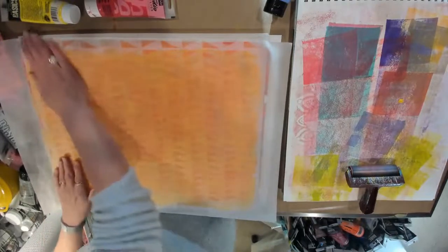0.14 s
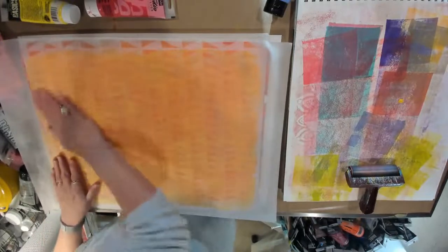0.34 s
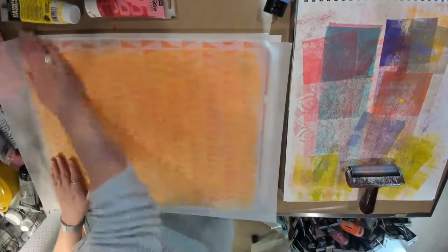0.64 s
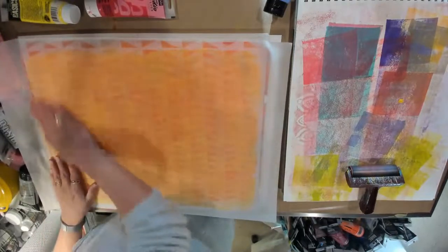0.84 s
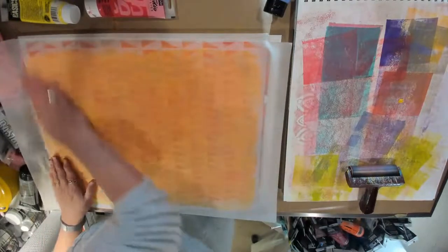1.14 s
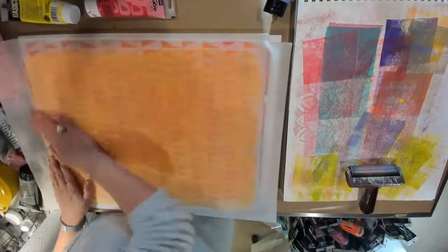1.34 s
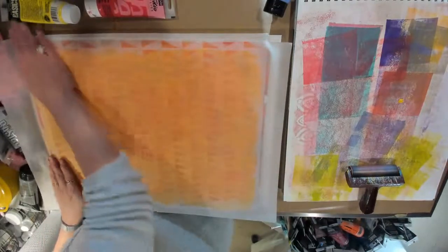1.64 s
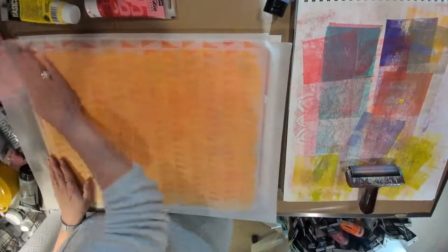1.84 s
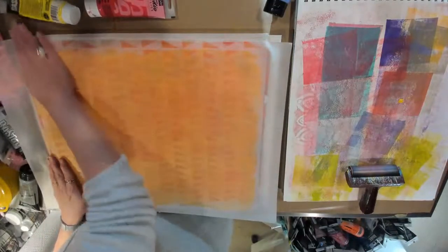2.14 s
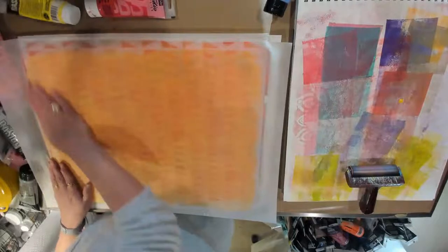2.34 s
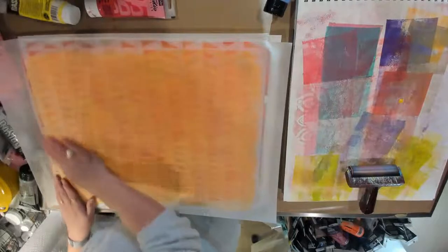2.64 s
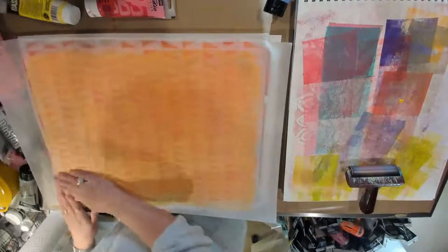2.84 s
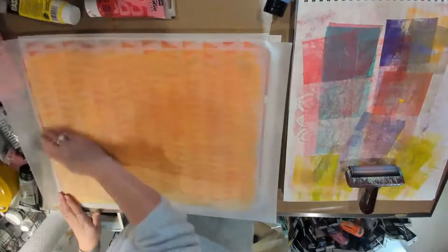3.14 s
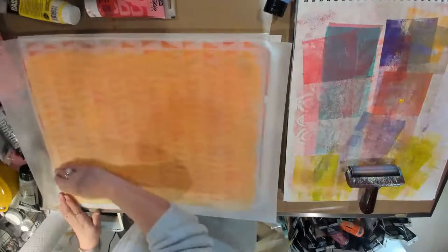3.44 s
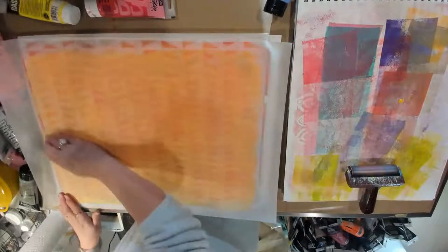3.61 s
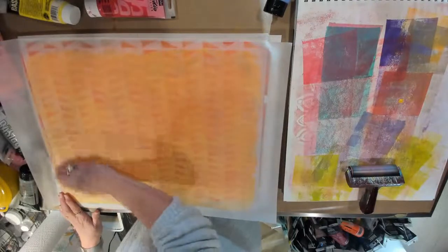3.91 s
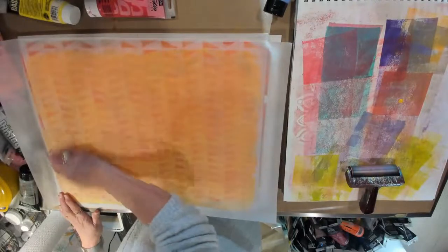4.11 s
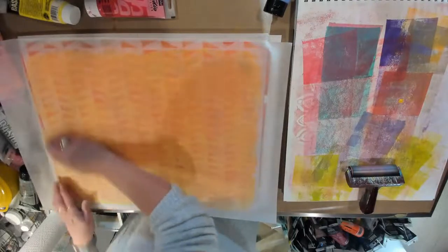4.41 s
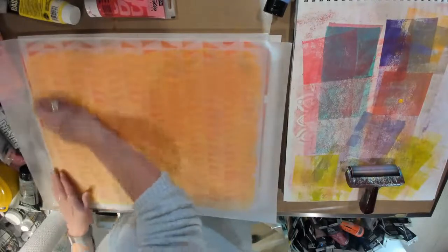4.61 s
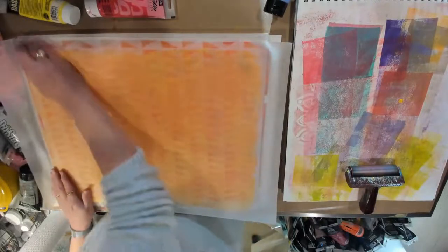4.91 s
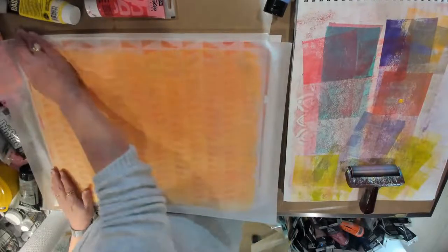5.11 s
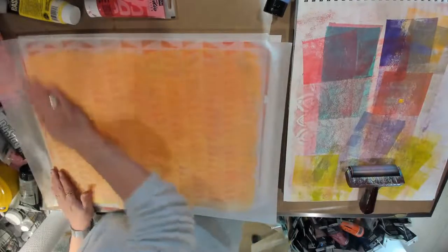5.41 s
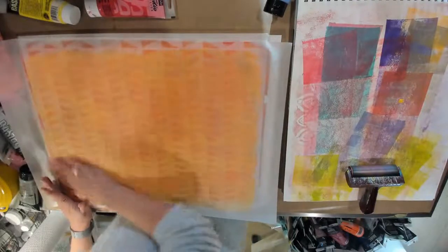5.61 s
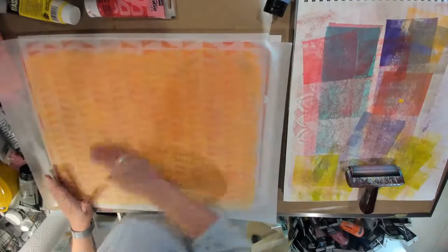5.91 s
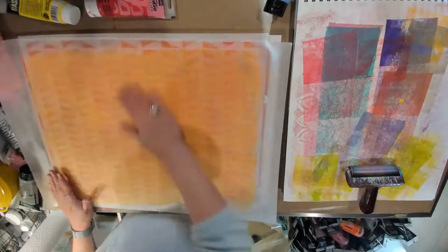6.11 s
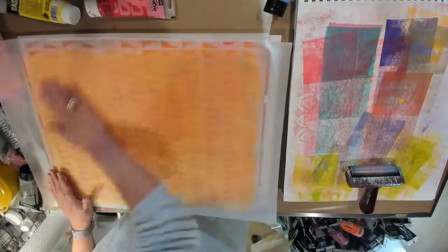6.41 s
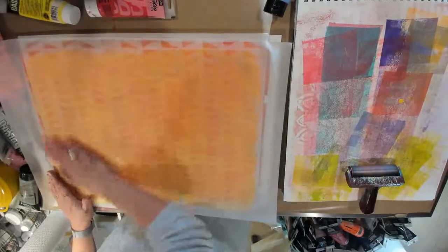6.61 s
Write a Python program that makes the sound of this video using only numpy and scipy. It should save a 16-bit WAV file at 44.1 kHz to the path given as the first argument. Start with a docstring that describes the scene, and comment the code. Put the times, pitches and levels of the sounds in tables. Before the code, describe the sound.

Close mono sound of skin sliding over paper on a tabletop. Fine airy hiss carries bright small crackles and lower papery folding. Strokes are irregular, some long and soft, some short and abrupt with sharp clicks. Clusters of snaps fall near one, two and a half, and five seconds, with a calmer spell between. Faint dull table knocks and thin squeaks appear over very quiet room air.

```python
"""In a quiet room, a palm rubs over thin paper lying on a soft printing plate on a table.
The skin slides with a fine hiss made of tiny slips; the paper crackles in small creases and wide folds.
Snaps and abrupt starts of strokes are short tones with a noisy rattle, and narrow bands of noise
sound for a while, from low rumbles to high singing.
Now and then the hand thumps the table, which rings at a few pitches, over faint room noise."""
import sys
import numpy as np
from scipy import signal
from scipy.fft import rfft, irfft, next_fast_len
from scipy.io import wavfile
from scipy.ndimage import uniform_filter1d, minimum_filter1d

SR = 44100
rng = np.random.default_rng(int(sys.argv[2]) if len(sys.argv) > 2 else 0)


def to_wav(s):
    """Save 16-bit WAV."""
    ch = np.atleast_2d(s).T  # columns
    pcm = np.round(np.clip(ch, -1, 1) * 32767)  # PCM
    wavfile.write(sys.argv[1], SR, pcm.astype(np.int16))


N = 297675  # length of the sound in samples

# Pushes of the hand: (strongest moment [s], swell [s], fade [s], skin hiss [dB], small creases [dB],
# wide folds [dB], air pocket under the palm [Hz])
PUSHES = [(0.029, 0.34, 0.13, -34.5, -36, -38.5, 5000), (0.306, 0.21, 0.13, -36.5, -41.5, -56, 4950),
          (0.538, 0.17, 0.17, -36.5, -42.5, -63, 4440), (0.67, 0.062, 0.048, -46, -35, -36.5, 3930),
          (0.75, 0.016, 0.066, -60, -48, -46, 3380), (0.79, 0.14, 0.1, -40, -68, -72.0, 4600),
          (0.858, 0.07, 0.11, -30, -28, -27.5, 3700), (0.905, 0.05, 0.022, -49, -25, -48, 4200),
          (1.003, 0.044, 0.12, -26.5, -20, -23, 4180), (1.083, 0.04, 0.046, -29, -20.5, -28.5, 3490),
          (1.141, 0.035, 0.093, -42, -28, -33.5, 3090), (1.218, 0.037, 0.15, -27, -21, -24.5, 5040),
          (1.345, 0.02, 0.056, -60, -40, -38, 2850), (1.385, 0.036, 0.04, -52, -47.5, -49, 4000),
          (1.439, 0.074, 0.33, -34.9, -39.5, -45, 4660), (1.675, 0.22, 0.058, -61, -38, -51, 3380),
          (1.823, 0.14, 0.055, -43.5, -40.5, -56, 4650), (1.929, 0.033, 0.16, -38.5, -35, -50, 4370),
          (2.023, 0.12, 0.042, -47, -26, -50, 3450), (2.11, 0.044, 0.055, -60, -64.0, -71.5, 4200),
          (2.2, 0.048, 0.093, -55, -33, -66, 2900), (2.25, 0.12, 0.31, -41.5, -27, -63, 3730),
          (2.309, 0.034, 0.15, -43.5, -32.5, -29, 3820), (2.427, 0.014, 0.047, -37.5, -29.2, -30.5, 4700),
          (2.522, 0.26, 0.23, -36, -30.5, -40.5, 4900), (2.721, 0.076, 0.16, -28, -27, -29, 4580),
          (2.905, 0.02, 0.038, -48.5, -49, -58, 4850), (2.99, 0.086, 0.14, -45.0, -52.0, -55.5, 4600),
          (3.104, 0.061, 0.084, -33, -33.5, -47.5, 3100), (3.161, 0.028, 0.088, -33, -17.5, -25, 3510),
          (3.229, 0.018, 0.09, -42, -25, -25.5, 3350), (3.387, 0.162, 0.063, -38, -44.5, -66, 5370),
          (3.533, 0.068, 0.2, -43, -63, -74, 5240), (3.6, 0.019, 0.042, -54.5, -52, -52, 3000),
          (3.64, 0.1, 0.029, -37.5, -56.5, -40.5, 4850), (3.812, 0.13, 0.064, -39, -59.5, -75.5, 5700),
          (3.927, 0.021, 0.096, -61.5, -43.5, -71, 3900), (3.984, 0.046, 0.086, -33, -42, -70, 5700),
          (4.045, 0.034, 0.043, -35.5, -39, -46.5, 5200), (4.147, 0.0086, 0.027, -26.5, -34, -38, 5400),
          (4.174, 0.049, 0.1, -26, -24.5, -32.5, 4900), (4.262, 0.042, 0.057, -37.4, -24.5, -34.5, 4440),
          (4.381, 0.056, 0.045, -42.3, -30, -35, 4830), (4.457, 0.19, 0.14, -41.5, -38, -45.5, 3230),
          (4.638, 0.21, 0.098, -30.6, -25, -31.5, 3540), (4.697, 0.057, 0.022, -29.5, -16, -27.5, 4340),
          (4.727, 0.064, 0.12, -33.5, -28.5, -34, 3660), (4.929, 0.15, 0.072, -45, -32.5, -53.5, 3210),
          (5.007, 0.055, 0.12, -42, -26, -29, 3480), (5.054, 0.044, 0.029, -24.5, -17, -23, 3770),
          (5.096, 0.063, 0.014, -39.7, -29.5, -52, 5030), (5.141, 0.041, 0.021, -41, -29.7, -37.5, 4450),
          (5.217, 0.025, 0.1, -28.5, -20, -29.5, 3700), (5.36, 0.24, 0.12, -42.5, -31.5, -47.5, 3260),
          (5.555, 0.33, 0.19, -40.9, -39.5, -54.5, 4420), (5.58, 0.054, 0.036, -55.0, -39, -43.5, 3600),
          (5.718, 0.014, 0.071, -51, -42.5, -36.5, 3020), (5.8, 0.02, 0.04, -56, -40.0, -45, 3300),
          (5.858, 0.2, 0.07, -46, -35, -41, 3600), (6.063, 0.016, 0.048, -24.5, -36, -32, 4640),
          (6.105, 0.26, 0.14, -29, -31.5, -41.5, 4400), (6.211, 0.2, 0.29, -32.5, -30, -68, 3800),
          (6.352, 0.17, 0.3, -29.5, -24, -47, 4240), (6.59, 0.27, 0.22, -42, -42, -80, 4580)]
# Snaps and abrupt starts of strokes: (time [s], level before filtering [dB], pitch [Hz], rattle time [s])
SNAPS_AND_STARTS = [(0.4327, -26, 3360, 0.0046), (0.844, -12.5, 2600, 0.0059), (0.9712, -23, 2770, 0.007),
                    (0.981, -16, 1720, 0.0024), (0.9977, -6, 2820, 0.031), (1.0721, -10.5, 3150, 0.0052),
                    (1.1382, -11, 2680, 0.0064), (1.2016, -11, 4680, 0.0025), (1.2255, -9, 5100, 0.005),
                    (1.3408, -23.5, 2370, 0.017), (1.689, -24.5, 2580, 0.0033), (1.9137, -20, 3200, 0.011),
                    (2.0194, -14, 3180, 0.0017), (2.029, -16, 2770, 0.0023), (2.1896, -27, 2820, 0.0016),
                    (2.2214, -15, 2670, 0.0015), (2.248, -16, 3000, 0.0016), (2.259, -13.5, 3400, 0.0018),
                    (2.2742, -3, 3420, 0.0017), (2.302, -4, 4400, 0.0022), (2.332, -13.5, 2920, 0.008),
                    (2.362, -14, 3100, 0.0043), (2.415, -25, 1600, 0.008), (2.4807, -18, 4730, 0.005),
                    (2.4932, -9, 4600, 0.0082), (2.5266, -16, 2620, 0.005), (2.6793, -11.5, 5200, 0.006),
                    (2.7103, -9, 1660, 0.0034), (2.7282, -2.5, 4930, 0.008), (3.0792, -22, 6400, 0.0077),
                    (3.1029, -14.5, 2890, 0.019), (3.15, -3.5, 2600, 0.0039), (3.2314, -12.5, 2430, 0.015),
                    (3.272, -14.5, 2390, 0.003), (3.6378, -21, 4640, 0.005), (3.92, -27.5, 3210, 0.011),
                    (3.9693, -16.5, 6000, 0.014), (4.0408, -20, 5480, 0.008), (4.1285, -24, 8400, 0.004),
                    (4.1443, -10.5, 5510, 0.004), (4.1608, -10, 5260, 0.0021), (4.2019, -7, 3120, 0.005),
                    (4.254, -11, 3900, 0.002), (4.2603, -2, 4900, 0.005), (4.3804, -22, 5120, 0.014),
                    (4.532, -8, 2440, 0.021), (4.5952, -11.5, 2630, 0.021), (4.6914, -5.5, 2560, 0.01),
                    (4.85, -15, 3030, 0.0017), (4.8968, -10, 3100, 0.00094), (4.9803, -10.5, 3090, 0.001),
                    (5.0044, -15.5, 2790, 0.005), (5.0924, -11, 4230, 0.012), (5.1235, -27, 1570, 0.0053),
                    (5.1376, -0.5, 6860, 0.0093), (5.208, -20.5, 3770, 0.0033), (5.2055, -4.5, 6960, 0.005),
                    (5.234, 0.5, 3080, 0.003), (5.2374, -5, 3000, 0.003), (5.3568, -19, 3200, 0.003),
                    (5.715, -28, 2780, 0.0079), (5.797, -22, 1830, 0.005), (5.8397, -20.5, 1760, 0.005),
                    (6.0611, -6.5, 4800, 0.013), (6.1983, -11, 2980, 0.0082)]
# Narrow bands of noise that sound for a while, from low rumbles to high singing:
# (start [s], end [s], pitch [Hz], level [dB])
NARROW_BANDS = [(0.204, 0.336, 3340, -50), (1.342, 1.477, 2410, -45), (1.594, 1.7, 1540, -59.5),
                (2.426, 2.465, 300, -54.5), (2.474, 2.726, 1598, -42), (2.536, 2.636, 2470, -49),
                (2.907, 3.012, 3490, -56.5), (2.707, 2.79, 828, -44), (3.482, 3.613, 5270, -50),
                (3.74, 3.861, 5400, -51.5), (3.967, 4.06, 5500, -37), (4.331, 4.466, 265, -53.5),
                (4.767, 4.91, 1250, -59.5), (4.967, 5.135, 1460, -39.5), (5.031, 5.09, 668, -48),
                (5.424, 5.697, 3400, -47), (6.298, 6.5, 3530, -31.5), (6.437, 6.515, 2060, -53.5),
                (6.544, 6.754, 3790, -50)]
# The hand meets the table: (time [s], level before filtering [dB], 60 dB fade [s], strongest pitch [Hz])
THUMPS = [(0.001, -17.5, 0.088, 189), (0.036, -22, 0.16, 527), (0.995, -43, 0.29, 896),
          (1.239, -40, 0.15, 1150), (2.423, -22.5, 0.13, 900), (2.437, -30.5, 0.085, 640),
          (2.72, -41.5, 0.24, 874), (4.689, -42.5, 0.22, 940), (5.214, -43, 0.3, 940),
          (6.057, -48, 0.12, 1080)]
# Pitches at which the table rings: (pitch [Hz], relative level [dB], own 60 dB fade [s]);
# the fade of each thump comes on top of this one
TABLE_MODES = [(472, 2.5, 2.7), (577, -9, 0.44), (717.5, -1.5, 3.0), (881, -2.5, 2), (1160, -12, 1.3)]

# Tone colours, each: (frequency [Hz], relative level [dB])
FIBRE_TONE = [(1500, -46), (2600, -21), (3400, -6.5), (4800, -11), (5600, -4), (6400, -3), (7800, -4),
              (9500, 0), (11800, -5.5), (12500, -10.5), (16000, -12)]  # skin on paper fibres
CREASE_TONE = [(1300, -56.5), (1900, 14), (2900, 10), (5200, 5), (7000, 0), (9000, -40.5), (16000, -59.5)]  # small creases
FOLD_TONE = [(350, -55), (700, -18.5), (1050, -21.5), (1300, -5), (1580, 0), (1850, -2.5), (2300, 0.5),
             (2800, -3), (3500, -28.5), (5000, -65)]  # wide folds
SNAP_TONE = [(900, -51.5), (1500, -2.5), (7000, 0), (16000, -21.0)]
THUMP_TONE = [(80, -30.0), (180, -14.5), (500, -10.5), (1100, -3.5), (1800, -26)]
ROOM_TONE = [(15, -51), (40, -22.5), (100, -4), (200, -4), (363, -5), (863, -10), (1020, -12.5),
             (1650, -14), (4370, -23.5), (8000, -60), (16000, -68.5)]  # air of the room

ROOM_GAIN_DB = -55
TOP_HZ = 15950  # nothing is kept from here up
EDGE_DB = 30  # how far a push has sunk one swell before and one fade after its strongest moment
# Shape of a push: 1 = pointed top, more = flatter top and steeper ends
HISS_FLAT, CREASE_FLAT, FOLD_FLAT = 1.91, 1.404, 1.29
# Share of smooth rustle under the crackle: a base, plus more per second that a push lasts
SMOOTH_BASE, SMOOTH_PER_S = 0.43, 2.7


def palm():
    """Skin drags over countless fibres: a fine, nearly smooth hiss, thinned below the air pocket."""
    hiss_db, pocket_hz = np.transpose(PUSHES)[[3, 6]]
    power = pushed(hiss_db, HISS_FLAT)
    grain = crackle(per_s=500, spread_db=3, smooth=2, ring_s=.0015)
    grain = patchy(coloured(grain, FIBRE_TONE), patchy_db=2, tall=2, long=20)
    grain = pocket(grain, blended(pocket_hz), sharpness=6.5, lift_db=-7.5, edge=0.6)
    return sampled(np.sqrt(power.sum(0))) * grain


def paper():
    """Small creases crackle high and short in a pocket that the hand reshapes; wide folds lower and longer."""
    _, swell, fade, _, small_db, wide_db, pocket_hz = np.transpose(PUSHES)
    # long slow sweeps are smoother than short shoves
    smooth = SMOOTH_BASE + SMOOTH_PER_S * blended(swell + fade)
    small_power = pushed(small_db, CREASE_FLAT)
    wide_power = pushed(wide_db, FOLD_FLAT)
    small = coloured(crackle(per_s=350, spread_db=4.8, smooth=smooth, ring_s=.0008), CREASE_TONE)
    wide = coloured(crackle(per_s=150, spread_db=5.0, smooth=0.47, ring_s=0.016), FOLD_TONE)
    small = patchy(small, patchy_db=5.0, tall=2, long=16)
    small = pocket(small, blended(pocket_hz), sharpness=1.72, lift_db=10.5, edge=0.66)
    wide = patchy(wide, patchy_db=2.5, tall=2, long=12)
    return sampled(np.sqrt(small_power.sum(0))) * small + sampled(np.sqrt(wide_power.sum(0))) * wide


def snaps_and_starts():
    """Snaps and abrupt starts of strokes: a tone of a few cycles with a noisy rattle that dies away."""
    out, t = np.zeros(N + SR), np.arange(SR // 10) / SR
    for time, db, hz, rattle_s in SNAPS_AND_STARTS:
        tone = np.sin(2 * np.pi * hz * t) * np.exp(-t * hz / 3.3)
        tone *= 1 - np.exp(-t * hz * 5.0)  # soft start
        rattle = 0.33 * rng.standard_normal(len(t)) * np.exp(-t / rattle_s)
        low_cut = signal.butter(4, .55 * hz, "high", fs=SR)
        burst = signal.lfilter(*low_cut, tone + rattle)
        out[round(time * SR):][:len(t)] += amp(db) * burst
    return coloured(out[:N], SNAP_TONE)


def narrow_bands():
    """Noise through one narrow resonance, from low rumbles to high singing, fading in and out of each span."""
    out = np.zeros(N)
    for start, end, hz, db in NARROW_BANDS:
        span = out[round(start * SR):round(end * SR)]
        band = rng.standard_normal(len(span))
        for _ in range(2):  # two passes narrow the band
            band = signal.lfilter(*signal.iirpeak(hz, 7.5, SR), band)
        span += amp(db) * unit(band) * signal.windows.tukey(len(span), .4)
    return out


def table():
    """Every thump rings the pitches nearest its strongest one most, with a dull puff of noise."""
    out, t = np.zeros(N + SR), np.arange(SR // 4) / SR
    for time, db, fade_s, spot_hz in THUMPS:
        ring = np.zeros(len(t))
        for hz, level, own_fade_s in TABLE_MODES:
            distance = abs(np.log(hz / spot_hz))
            gain = amp(level + rng.normal(0, 1) - 7.1 * distance)  # each strike varies a little
            ring += gain * np.sin(2 * np.pi * hz * t) * amp(-60 * t / own_fade_s)
        puff = rng.standard_normal(len(t))
        puff = 9.1 * signal.lfilter(*signal.iirpeak(spot_hz, 1.6, SR), puff)
        envelope = amp(db - 60 * t / fade_s) * (1 - np.exp(-t / 0.0027))
        out[round(time * SR):][:len(t)] += envelope * (ring + puff)
    return coloured(out[:N], THUMP_TONE)


def room():
    """The faint steady air of the room: coloured noise, wavering in patches."""
    air = coloured(rng.standard_normal(N), ROOM_TONE)
    return amp(ROOM_GAIN_DB) * patchy(air, patchy_db=2, tall=1, long=8)


def pushed(level_db, flat):
    """Power of every push over time, a value each millisecond: it swells to its level and fades."""
    peak_s, swell, fade = np.transpose(PUSHES)[:3, :, None]
    late = np.arange(0, N / SR, .001) - peak_s
    away = np.where(late < 0, -late / swell, late / fade)
    return amp(np.maximum(level_db[:, None] - EDGE_DB * away ** flat, -150)) ** 2


def blended(values):
    """A value per push turned into one per sample, weighted by the power of the pushes at work."""
    hiss_db, small_db = np.transpose(PUSHES)[3:5]
    power = pushed(np.maximum(hiss_db, small_db), CREASE_FLAT)
    return sampled(values @ power / power.sum(0))


def sampled(ms):
    """One value per sample from one per millisecond, joined by straight lines."""
    return np.interp(np.arange(N) / SR * 1000, np.arange(len(ms)), ms)


def crackle(per_s, spread_db, smooth, ring_s):
    """Random slips of very unequal size, each a short noisy burst, over a smooth rustle."""
    sizes = amp(spread_db * np.minimum(rng.exponential(1, N), 3))
    slips = (rng.random(N) < per_s / SR) * sizes
    t = np.arange(SR // 50) / SR
    # power of all bursts; abs guards against tiny negative rounding errors
    bursts = np.abs(signal.fftconvolve(slips ** 2, np.exp(-2 * t / ring_s))[:N])
    power = (smooth + bursts / np.mean(bursts)) / (smooth + 1)
    return np.sqrt(power) * rng.standard_normal(N)


def pocket(x, centre_hz, sharpness, lift_db, edge):
    """A moving resonance, with little sound below edge times its centre; the gain is evened out over time."""
    hz, t, z = signal.stft(x, SR, nperseg=512)
    ratio = (hz[:, None] + 1) / centre_hz[np.minimum((t * SR).astype(int), N - 1)]
    resonance = 1 + amp(lift_db) / (1 + (sharpness * np.log(ratio)) ** 2)
    gain = resonance / (1 + (edge / ratio) ** 8)
    # keep the average power the same wherever the resonance moves
    mean = np.mean(np.abs(z) ** 2, axis=1, keepdims=True)
    gain /= np.sqrt(np.sum(gain ** 2 * mean, axis=0) / np.sum(mean))
    return signal.istft(z * gain, SR, nperseg=512)[1][:N]


def patchy(x, patchy_db, tall, long):
    """x with patches of random gain, smoothed over tall frequency bins and long time frames."""
    z = signal.stft(x, nperseg=512)[2]
    field = uniform_filter1d(rng.standard_normal(z.shape), tall, 0)
    field = uniform_filter1d(field, long, 1)
    return unit(signal.istft(z * amp(patchy_db * unit(field)), nperseg=512)[1][:N])


def coloured(x, points):
    """x through a tone colour of (frequency [Hz], level [dB]) points on a log axis."""
    m = next_fast_len(N + 8192)
    f, db = np.transpose(points)
    bins_hz = np.fft.rfftfreq(m, 1 / SR)
    gain = amp(np.interp(np.log(bins_hz + 1), np.log(f + 1), db))
    return irfft(rfft(x, m) * gain, m)[:N]


def amp(db):
    """Decibels to gain."""
    return 10 ** (np.asarray(db) / 20)


def unit(x):
    """Scaled to an rms (average strength) of 1."""
    return x / np.sqrt(np.mean(x ** 2) + 1e-20)


def suppressor(x, margin_db, depth_db, release):
    """Turns down every band whose briefly averaged power stands little above its own quiet level."""
    z = signal.stft(x, nperseg=512)[2]
    power = uniform_filter1d(np.abs(z) ** 2, size=5, axis=0)
    # release = share of the last frame's average that is carried over
    held = signal.lfilter([1 - release], [1, -release], power, axis=1, zi=release * power[:, :1])[0]
    quiet = uniform_filter1d(np.percentile(held, 5, axis=1), size=9)[:, None]
    over = (held / (quiet * amp(2 * margin_db))) ** 2  # 2: these are powers
    gain = np.maximum(over / (1 + over), amp(-depth_db))
    return signal.istft(z * gain, nperseg=512)[1][:N]


def limiter(x, ceiling):
    """Eases the gain down for a few milliseconds around any peak over the ceiling."""
    needed = np.minimum(1, ceiling / (np.abs(x) + 1e-9))
    return x * uniform_filter1d(minimum_filter1d(needed, size=257), size=129)


def scene():
    """All sources added together in one channel."""
    return (palm() + paper() + snaps_and_starts() + narrow_bands() + table() + room())[None]


def record(dry):
    """Noise suppression, a peak limiter, a bass cut around 50 Hz, and nothing from TOP_HZ up."""
    x = suppressor(dry[0], margin_db=9.5, depth_db=8.5, release=0.41)
    x = limiter(x, ceiling=.83)
    m = next_fast_len(N + 8192)
    hz = np.fft.rfftfreq(m, 1 / SR)
    bass_cut = hz ** 2 / (hz ** 2 + 50 ** 2)
    return irfft(rfft(x, m) * (hz < TOP_HZ) * bass_cut, m)[None, :N]


dry = scene()
out = record(dry)
to_wav(out)
```